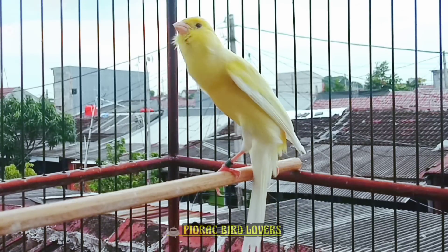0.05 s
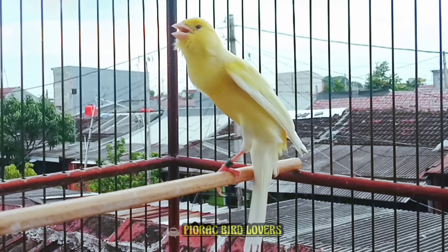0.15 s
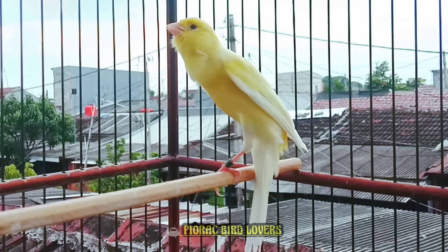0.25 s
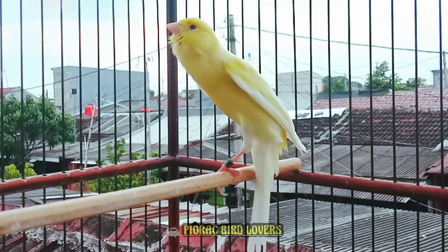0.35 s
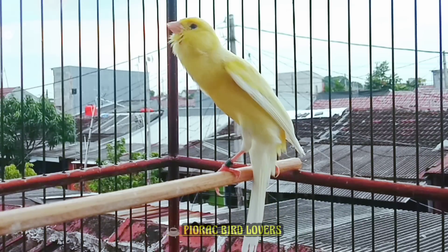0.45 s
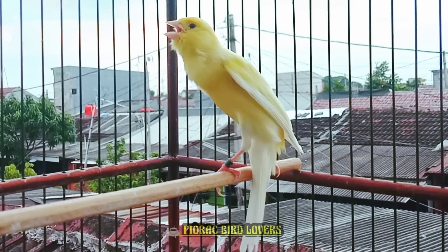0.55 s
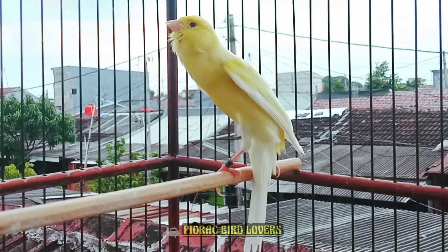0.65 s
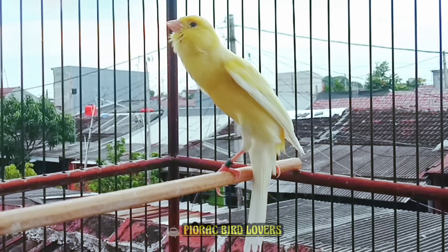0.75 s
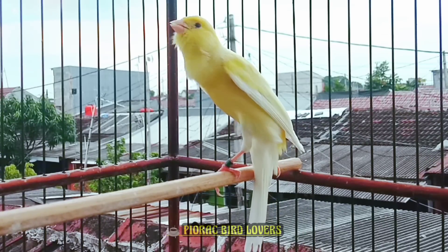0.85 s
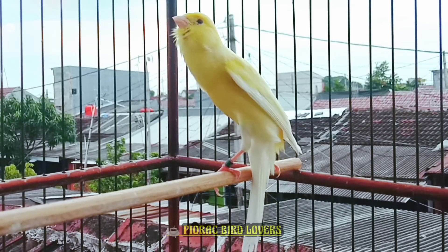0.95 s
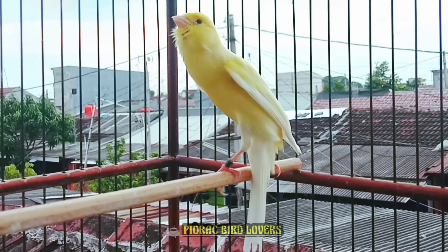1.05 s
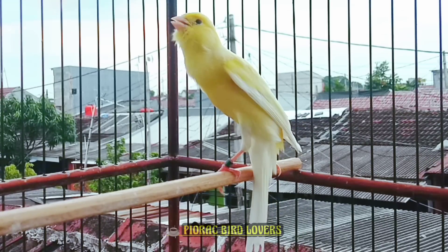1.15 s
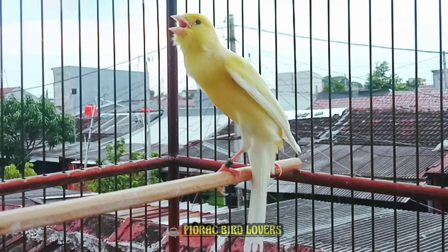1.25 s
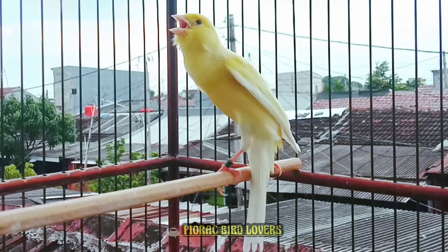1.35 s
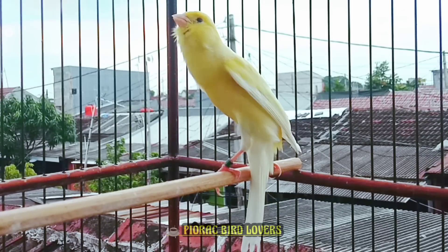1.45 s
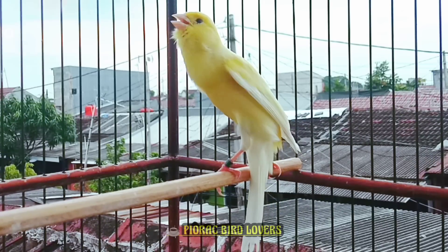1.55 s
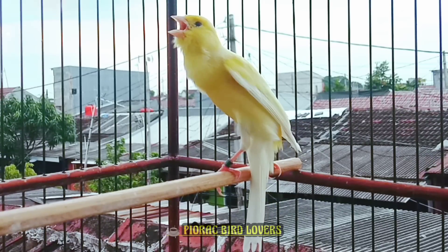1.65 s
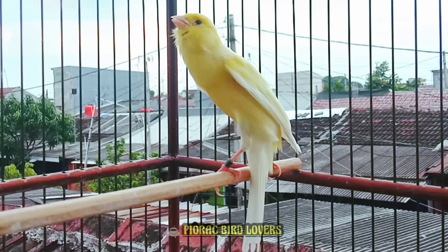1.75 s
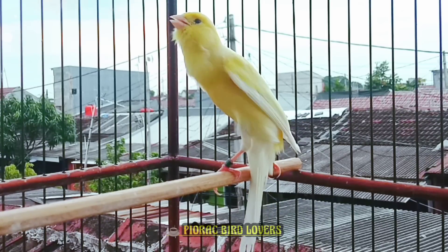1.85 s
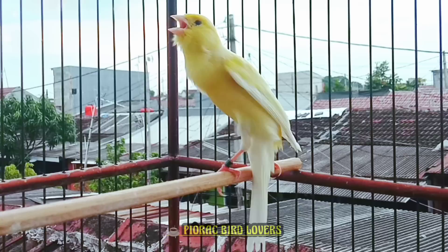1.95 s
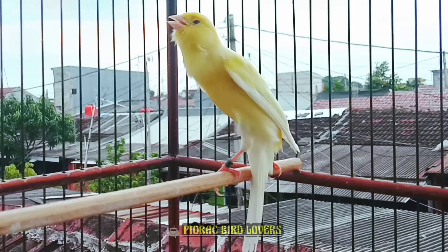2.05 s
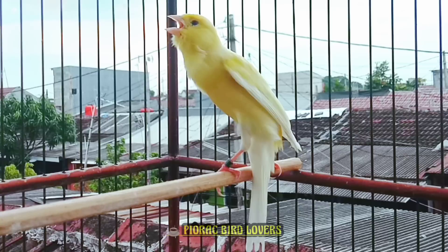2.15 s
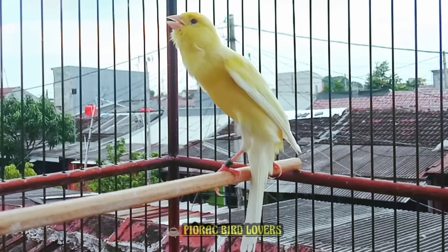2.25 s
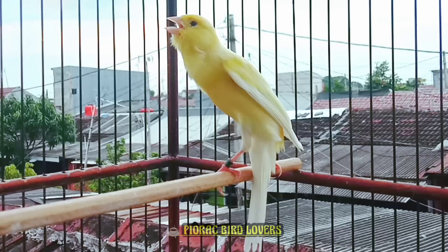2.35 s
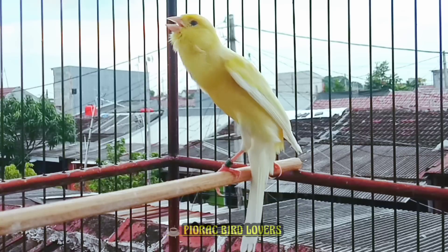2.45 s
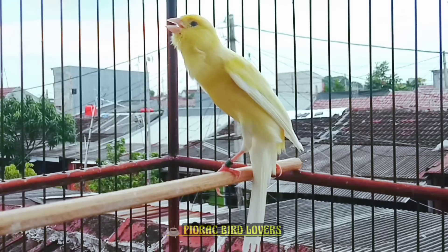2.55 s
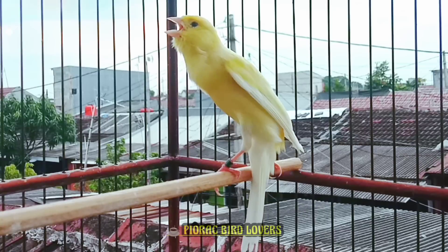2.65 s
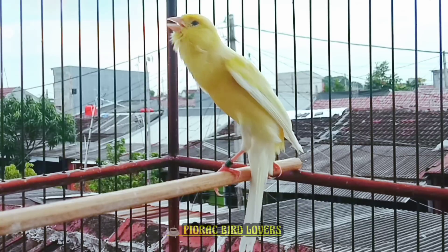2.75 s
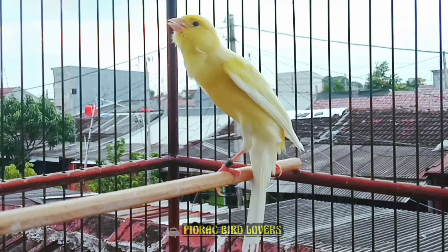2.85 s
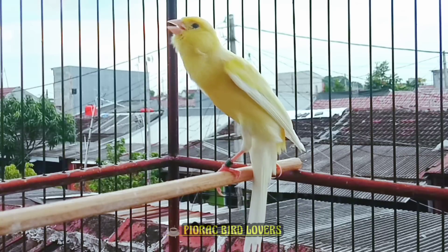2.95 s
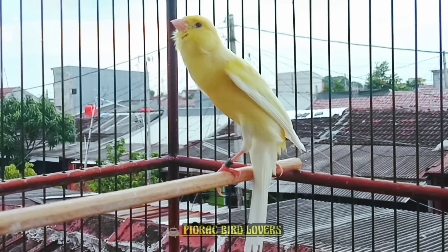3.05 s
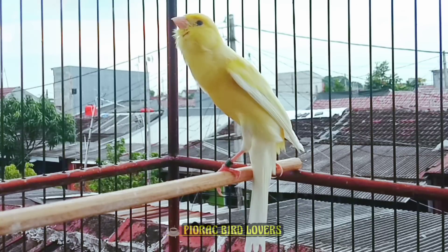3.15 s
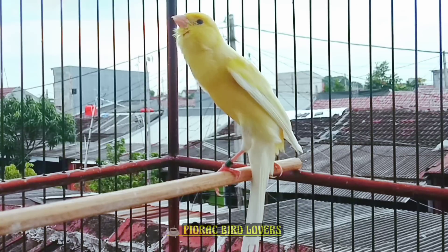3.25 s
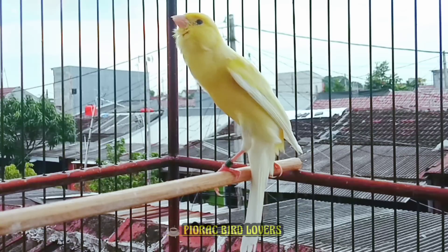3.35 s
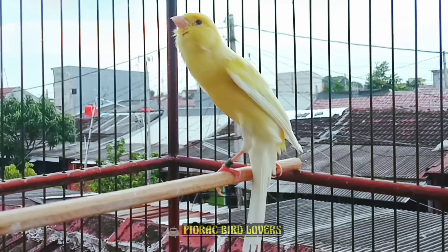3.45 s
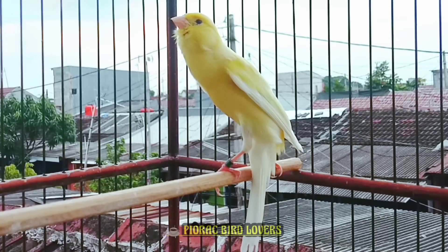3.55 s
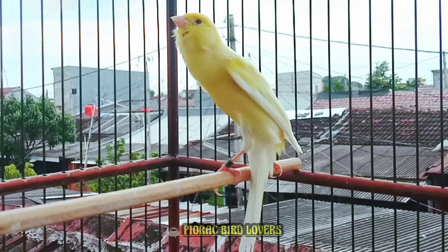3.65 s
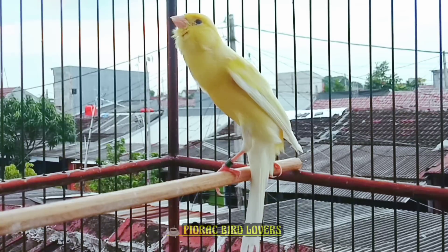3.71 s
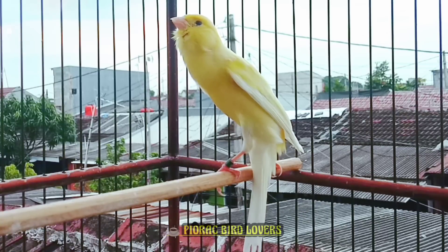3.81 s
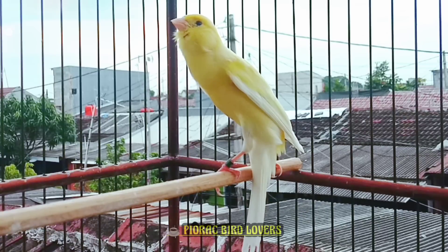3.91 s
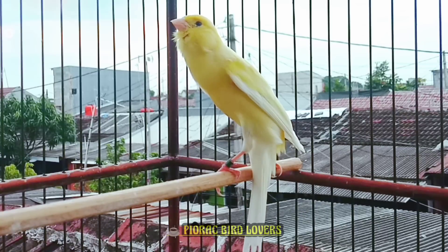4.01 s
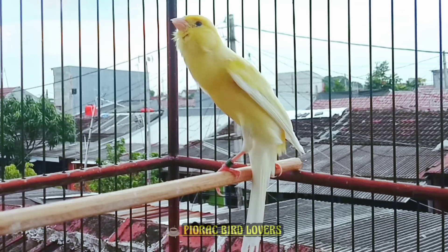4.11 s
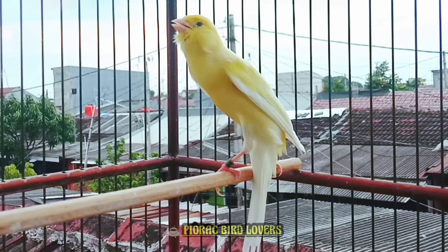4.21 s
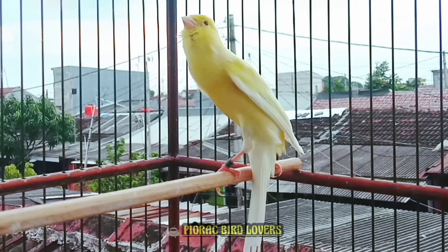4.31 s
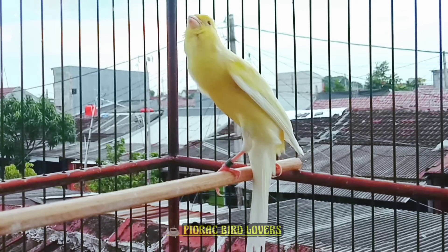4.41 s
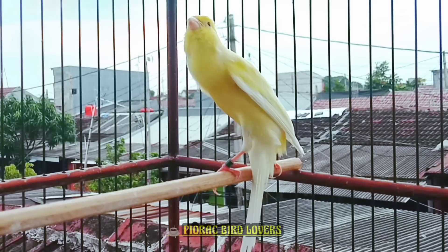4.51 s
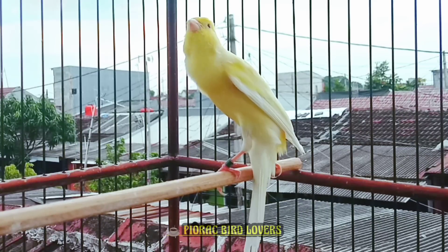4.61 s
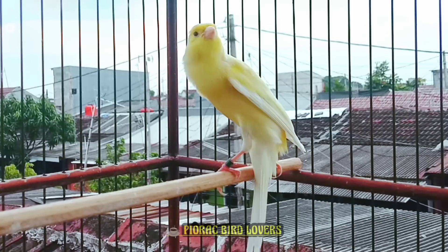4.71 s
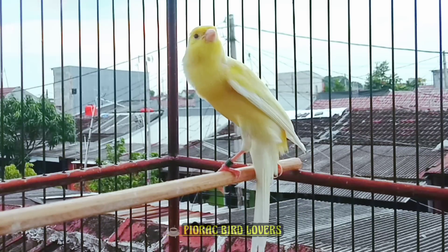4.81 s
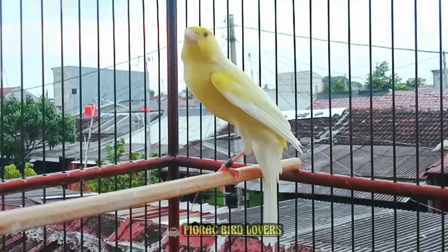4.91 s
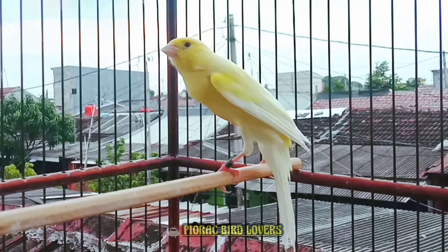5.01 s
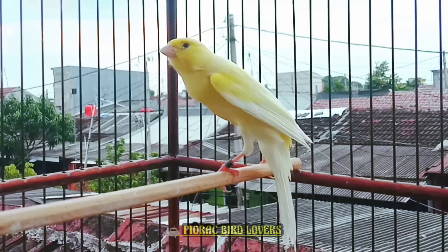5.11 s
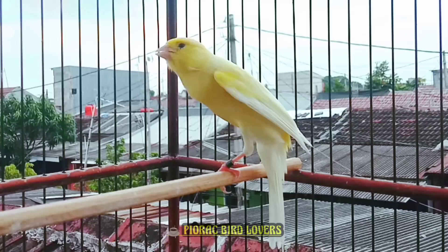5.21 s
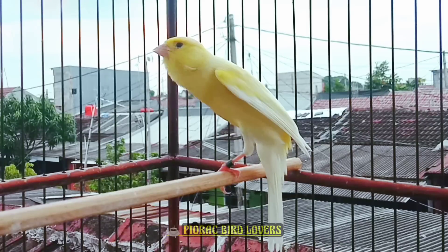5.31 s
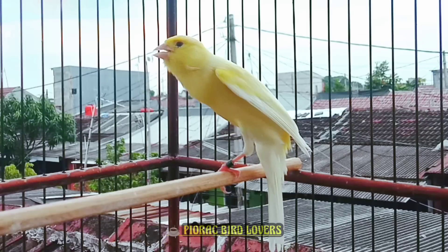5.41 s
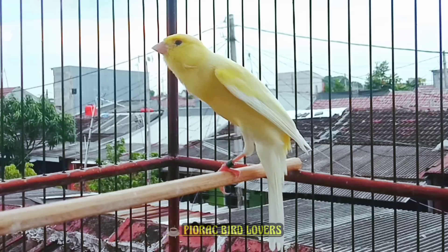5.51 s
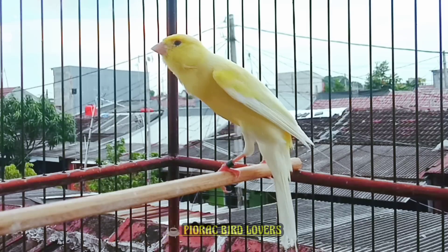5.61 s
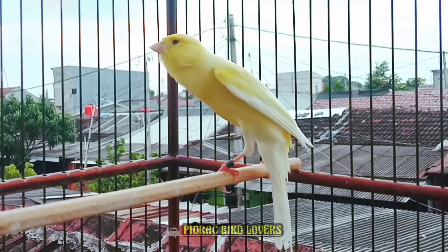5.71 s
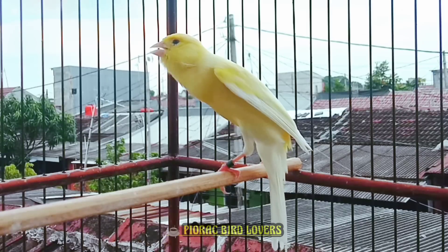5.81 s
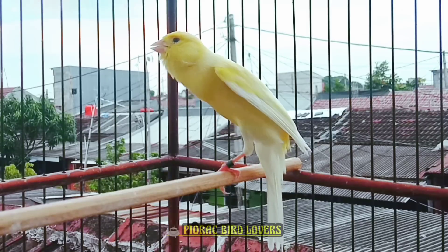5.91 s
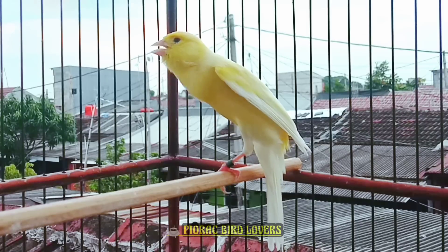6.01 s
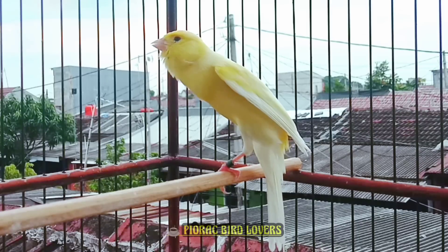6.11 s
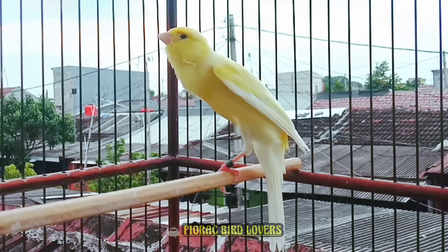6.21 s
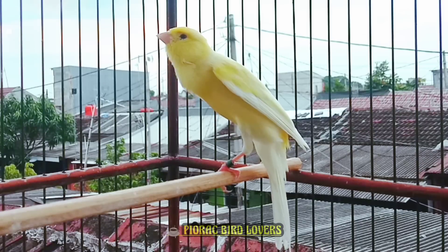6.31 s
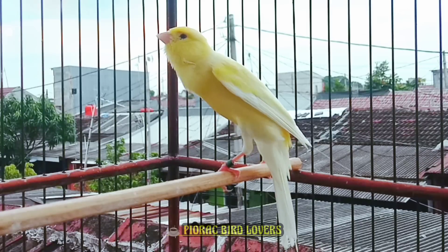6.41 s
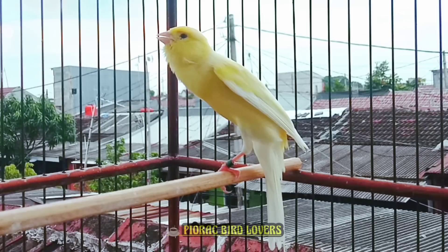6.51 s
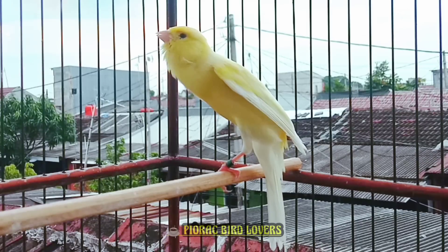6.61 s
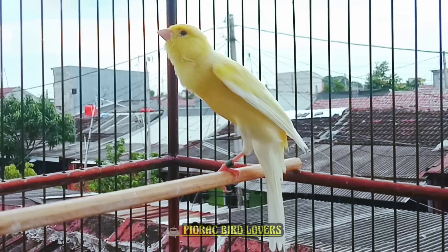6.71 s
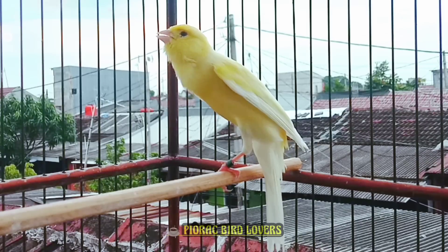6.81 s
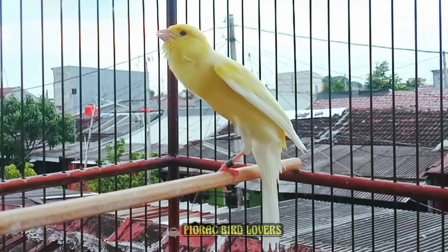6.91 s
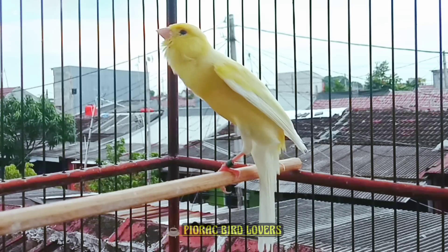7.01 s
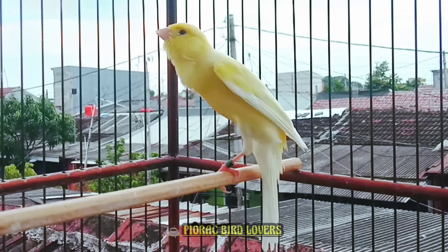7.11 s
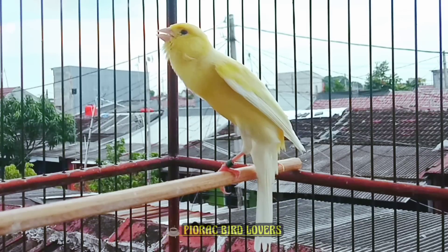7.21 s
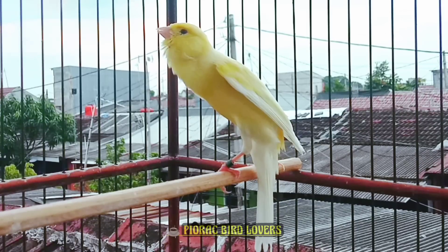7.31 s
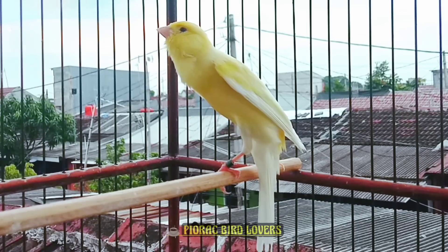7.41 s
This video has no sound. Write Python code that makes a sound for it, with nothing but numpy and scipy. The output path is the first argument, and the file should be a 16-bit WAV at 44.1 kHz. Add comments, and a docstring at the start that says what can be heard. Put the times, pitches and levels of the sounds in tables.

```python
"""A roof terrace: a caged canary sings close to the microphone, with chips, whistles, buzzes, sweeps, a ticking
trill, rolls and long falls. Each note is one gesture of pitch and pressure, repeated with small changes;
a near-sine voice flutters when it rasps, and cage and walls echo it.
Other cage birds call further off as quick glides and blurred streaks of tone, under a thin sinking whine.
Filtered noise makes the street's rumble, murmur and air; firing harmonics make its two engines."""
import sys
import numpy as np
from scipy import signal
from scipy.fft import rfft, irfft
from scipy.io import wavfile
from scipy.ndimage import uniform_filter1d, minimum_filter1d, map_coordinates

SR = 44100
rng = np.random.default_rng(int(sys.argv[2]) if len(sys.argv) > 2 else 0)


def digitize_waveform(pressure):
    """Quantize a signal to 16-bit integers and store it at the path in sys.argv[1].

    Rows of a 2-D input are taken as channels; values are limited to [-1, 1].
    """
    field = np.atleast_2d(pressure).T
    bounded = np.clip(field, -1, 1)
    quanta = np.round(bounded * 32767).astype(np.int16)
    wavfile.write(sys.argv[1], SR, quanta)


N = 328986
T = np.arange(N) / SR


def amp(db):
    """Decibels to gain."""
    return 10 ** (np.asarray(db) / 20)


def unit(x):
    """Scale to rms 1."""
    return x / np.sqrt(np.mean(x ** 2))


def ebb(x, span):
    """Fall from 1 to 0 over a span."""
    return np.clip(1 - x / span, 0, 1)


def follow(rows, t):
    """The columns of a table, joined by straight lines."""
    at, *columns = np.transpose(rows)
    return [np.interp(t, at, column) for column in columns]


def wander(rate_hz, t=T):
    """Smooth chance with a spread near 1: random knots joined by a cubic curve."""
    knots = rng.standard_normal(int((t[-1] - t[0]) * rate_hz) + 3)
    return map_coordinates(knots, [(t - t[0]) * rate_hz], order=3, mode="nearest")


def turn(hz):
    """Phase of an oscillator, from its running frequency."""
    return 2 * np.pi * np.cumsum(hz) / SR


def colour(x, points):
    """Filter by a spectrum of (Hz, dB) points, joined on a logarithmic pitch scale."""
    hz, db = np.transpose(points)
    f = np.maximum(np.fft.rfftfreq(2 * N, 1 / SR), 1)
    gain = amp(np.interp(np.log(f), np.log(hz), db))
    return irfft(rfft(x, 2 * N) * gain)[:N]


def hiss(count, hz, width_hz):
    """Noise in one band, rms 1."""
    edges = [max(hz - width_hz / 2, 20), hz + width_hz / 2]
    band = signal.butter(2, edges, "band", fs=SR, output="sos")
    return unit(signal.sosfilt(band, rng.standard_normal(count)))


def add(track, start_s, sound):
    """Mix a sound in at a given time, trimmed to the length of the scene."""
    i = int(round(start_s * SR))
    sound = sound[..., max(-i, 0):N - i]
    track[..., max(i, 0):max(i, 0) + sound.shape[-1]] += sound


def syrinx(t, hz, db, rasp, flutter_hz, overtones, flicker_db, hiss_db):
    """A near-sine voice; rasp makes it flutter in pitch and pressure. Rows: fundamental, overtones with hiss."""
    swing, jitter = .11, .068  # shares of the pitch at full rasp
    shape = .65  # how long the syrinx stays shut in each flutter (below 1 = narrow pulses)
    flutter = turn(flutter_hz * (1 + .14 * wander(150, t)))
    hz = hz * (1 + rasp * (-swing * np.cos(flutter + 1.6) + jitter * wander(1300, t)))
    shut = (.5 - .5 * np.cos(flutter)) ** shape
    pulses = (1 - np.clip(rasp, 0, 1) * shut) * amp(2 * rasp * wander(500, t))
    edges = np.clip(np.minimum(t - t[0], t[-1] - t) / .0012, 0, 1)  # soft ends against clicks
    phase = turn(hz)
    partials = []
    for multiple, level_db in overtones:
        audible = multiple * hz < SR / 2
        partials.append(amp(level_db) * np.sin(multiple * phase) * audible)
    upper = sum(partial * amp(flicker_db * wander(130, t)) for partial in partials[1:])
    air = amp(hiss_db) * rasp * rng.standard_normal(len(t))
    return np.array([partials[0], upper + air]) * amp(db) * pulses * edges


def notes(table, pitch_hz, attack, release, sag_db, rasp, clears=.78, grain=.09, flutter_hz=240, slows=0,
          waver=.002, shimmer_db=1.2, flicker_db=5.0, bright_db=0, hiss_db=-28, overtones=None, ratio=1):
    """Repeat one varied gesture: pressure swells, sags and lets go; the opening rasp clears to a fine grain.
    Places in pitch_hz, attack, release and clears are shares of the note's length."""
    # overtones of the singing voice: multiple, level_db
    voice_overtones = [(1, 0), (2, -31.5), (3, -38.5), (4, -44.5)]
    depth_db = 17  # a note swells from, and fades to, this far down
    out = np.zeros((2, N))
    for start_s, length_s, note_db, reach in table:
        t = np.arange(int(length_s * SR)) / SR
        u = t / length_s
        hz = ratio * follow(pitch_hz, u)[0] * (1 + (reach - 1) * u) * (1 + waver * wander(250, t))
        swell_db = -depth_db * (ebb(u, attack) + ebb(1 - u, release))
        db = note_db - sag_db * u + swell_db + shimmer_db * wander(220, t)
        rough = grain + (rasp - grain) * ebb(u ** 2, clears ** 2)
        slowing_hz = flutter_hz * (1 - slows * u)
        add(out, start_s, syrinx(t, hz, db, rough, slowing_hz, overtones or voice_overtones, flicker_db, hiss_db))
    return out * amp([[0], [bright_db]])


def canary():
    """The near bird's song; in the buzzes the second side of the syrinx sings below the first."""
    # gesture of each kind of note: pitch_hz path (share of length, Hz), attack and release (shares), sag_db
    # over the note, opening rasp (0-1), the share by which it clears, and the grain (0-1) that stays
    slur = dict(pitch_hz=[(0, 2720), (.24, 3100), (.52, 3880), (.8, 4240), (1, 4400)],
            attack=.36, release=.035, sag_db=6, rasp=.45, clears=.3, grain=.06)
    chip = dict(pitch_hz=[(0, 4800), (.17, 5550), (.38, 5546), (.58, 5420), (1, 3844)],
            attack=0.13, release=0.11, sag_db=-4, rasp=0.22, clears=0.47, grain=0.18, flutter_hz=191, waver=.008, shimmer_db=3.5, hiss_db=-14, bright_db=0.5)
    whistle = dict(pitch_hz=[(0, 2812), (.12, 2905), (.6, 2926), (1, 2895)],
               attack=0.029, release=0.037, sag_db=0.5, rasp=0, grain=0.025, waver=0.0029, shimmer_db=-0.3, flicker_db=0, bright_db=0.5)
    squeak = dict(pitch_hz=[(0, 5640), (.6, 6210), (1, 6330)],
              attack=.08, release=.1, sag_db=2.5, rasp=0.16, grain=0.15, flutter_hz=165, bright_db=-0.5)
    buzz = dict(pitch_hz=[(0, 6410), (.3, 5630), (.55, 4740), (.77, 2950), (1, 2364)],
            attack=0.35, release=0.039, sag_db=18, rasp=.9, grain=0.77, flutter_hz=192.6, slows=0.35, hiss_db=-25.5, bright_db=-0.5)
    sweep = dict(pitch_hz=[(0, 3700), (.17, 3666), (.5, 4430), (1, 5790)],
             attack=0.17, release=0.016, sag_db=5.5, rasp=0.82, clears=0.39, grain=0.1, flutter_hz=240.8, hiss_db=-25.5, bright_db=0)
    hook = dict(pitch_hz=[(0, 3180), (.28, 3780), (.64, 4400), (1, 4660)],
            attack=0.13, release=0.34, sag_db=3, rasp=0.81, clears=0.54, flutter_hz=234.7, bright_db=-2.5)
    tick = dict(pitch_hz=[(0, 3000), (.35, 2790), (.75, 2460), (1, 1950)],
            attack=.4, release=.22, sag_db=-2, waver=.007, rasp=.5, clears=.4, grain=.13, hiss_db=-25, bright_db=-2)
    chirp = dict(pitch_hz=[(0, 5260), (.38, 5260), (.78, 4560), (1, 3390)],
             attack=0.71, release=0.18, sag_db=-10.5, rasp=0.97, clears=.6, flutter_hz=186, hiss_db=-15)
    coo = dict(pitch_hz=[(0, 2880), (.2, 3002), (.85, 3000), (1, 2850)],
           attack=0.045, release=0.24, sag_db=7, rasp=0.17, waver=0.0012, shimmer_db=3.5, flicker_db=4, bright_db=6)
    pickup = dict(pitch_hz=[(0, 4070), (.55, 4615), (1, 4800)],
              attack=0.067, release=0.059, sag_db=-11.5, rasp=0, bright_db=2.5)
    roll = dict(pitch_hz=[(0, 3150), (.14, 2220), (.44, 3600), (.7, 4320), (.92, 4670), (1, 4620)],
            attack=.44, release=.035, sag_db=1, bright_db=-4, rasp=.5, clears=.22, grain=.075, shimmer_db=1.1)
    fall = dict(pitch_hz=[(0, 4980), (.14, 4320), (.32, 3830), (.6, 3540), (.86, 3150), (.93, 2680),
            (1, 1500)],
            attack=.09, release=.05, sag_db=5, bright_db=-3, rasp=.25, clears=.1, grain=.055, shimmer_db=1.0)
    # notes sung: start_s, length_s, level_db, reach (factor on the pitch by the end of the note)
    slurs = [(-0.043, 0.088, -4.5, .985), (0.172, 0.079, -2, 1.005)]
    chips = [(0.365, 0.045, -11.5, .995), (0.633, 0.045, -11, 0.95), (0.978, 0.043, -10, 0.97)]
    whistles = [(0.429, 0.16, -17, 0.99), (0.695, 0.14, -16.5, 0.99), (1.039, 0.14, -17, 0.99)]
    squeaks = [(1.297, 0.032, -24, 1.13), (1.326, 0.019, -8, 0.96), (1.66, .028, -10, 1.08)]
    buzzes = [(1.338, .172, -1, .96), (1.69, .163, -0.5, 1.047)]
    sweeps = [(1.61, 0.064, -4, 1), (1.969, 0.058, -4, 0.93), (2.157, 0.07, -5, .99),
              (2.346, 0.068, -4.5, 1), (2.532, 0.065, -4, .99), (2.687, 0.069, -4.5, 0.95)]
    hooks = [(2.82, 0.072, -5.5, 1.05), (2.959, 0.057, -5.5, .985)]
    chirps = [(4.323, 0.034, -14, 0.99)]
    coos = [(4.38, 0.17, -23.5, 0.95)]
    pickups = [(5.295, 0.018, -24.5, 1), (5.776, 0.034, -20, 0.97)]
    rolls = [(5.317, 0.071, -12, 1.07), (5.384, 0.068, -10, 1.06), (5.454, 0.065, -10, 1.02),
             (5.808, 0.071, -11, 1.026), (5.878, 0.065, -9, 1.013), (5.944, 0.07, -8.5, 0.98),
             (6.016, 0.065, -8.5, .955), (6.088, 0.062, -8.5, 0.88), (6.158, 0.064, -10, 0.91)]
    falls = [(6.507, 0.21, -10, 0.99), (6.891, 0.19, -8.5, 0.99), (7.23, 0.19, -9, 0.98)]
    # how the fundamental carries from beak to microphone; glides swell and dip through it: pitch_hz, level_db
    carry = [(1700, -7.5), (2250, -10.5), (2600, -5), (3050, -10), (3480, -5), (3690, -12), (3860, -6),
             (4400, -0.5), (4920, -8.5), (5300, -5), (5530, -11.5), (5760, 0), (6400, -10.5)]
    # how the overtones and hiss carry to the microphone: pitch_hz, level_db
    treble = [(2000, -12), (5800, 4), (7500, 0), (9000, -6.5), (10500, -17), (11600, -18), (12800, -19),
              (14000, -11.5), (15300, -4)]
    song = [(slurs, slur), (chips, chip), (whistles, whistle), (squeaks, squeak), (buzzes, buzz),
            (sweeps, sweep), (hooks, hook), (trill(), tick), (chirps, chirp), (coos, coo),
            (pickups, pickup), (rolls, roll), (falls, fall)]
    first_side = sum(notes(table, **gesture) for table, gesture in song)
    second_side = amp(-8) * notes(buzzes, ratio=.77, **buzz)
    tone, upper = first_side + second_side
    return colour(tone, carry) + colour(upper, treble) + beeps() + puffs()


def street():
    """Steady noise shaped into traffic rumble and murmur, faint air and two narrow bands of drone."""
    # spectrum of traffic: pitch_hz, level_db
    traffic_colour = [(15, -42), (25, -22), (38, -26), (92, 3.5), (113, 7.5), (190, -6.5), (252, -27),
                      (310, -24), (432, -35.5), (575, -32.5), (684, -43), (1100, -66.5), (1430, -61),
                      (2420, -120)]
    # spectrum of air: pitch_hz, level_db
    air_colour = [(500, -7), (900, 3), (1500, -3.5), (2200, -6.5), (4000, -3.5), (7000, -3), (9000, -21.5),
                  (15000, -21.5)]
    # droning bands: centre_hz, width_hz, level_db
    drones = [(1248, 94, -60.5), (1761, 146, -58.5)]
    # swells of passing traffic: peak_s, half_length_s, rise_db
    swells = [(0.401, 0.23, 4), (1.552, 0.36, 5.6), (7.181, .2, 8.2)]
    swell_db = sum(db * np.exp(-((T - at) / half) ** 2) for at, half, db in swells)
    rumble = colour(colour(rng.standard_normal(N), traffic_colour), [(170, 0), (400, -40)])
    murmur = colour(colour(rng.standard_normal(N), traffic_colour), [(120, -40), (260, 0)])
    air = colour(rng.standard_normal(N), air_colour)
    out = unit(rumble) * amp(-43 + swell_db + 2 * wander(11))
    out += unit(murmur) * amp(-56 + 2 * wander(16))
    out += unit(air) * amp(-60 + 1.4 * wander(8))
    for hz, width_hz, db in drones:
        out += hiss(N, hz, width_hz) * amp(db + 2 * wander(6.6))
    return out


def chorus():
    """Far song smeared by the walls: wavering sines overlap as patchy, fading streaks of tone."""
    # level over time: time_s, level_db
    levels = [(0, -47.5), (2.4, -55), (4.3, -48.5), (4.8, -60.5), (7.46, -74.5)]
    # spectrum: pitch_hz, level_db
    spectrum = [(2000, -31), (3200, 4), (4000, 10.5), (5500, 4), (6300, 6.5), (7200, -12), (9000, -34.5)]
    streaks = np.zeros(N)
    for hz in np.geomspace(2800, 7600, 30):
        tone = np.sin(turn(hz * (1 + .01 * wander(90))))
        streaks += tone * amp(3.5 * wander(33))
    level_db, = follow(levels, T)
    return unit(colour(streaks, spectrum)) * amp(level_db)


def far_birds():
    """A second canary's trills: quick, slightly rasping glides repeated at an even rate."""
    # trills, before the far bird's mix level: start_s, end_s, rate_hz (notes per s), first_hz, last_hz, level_db
    far_trills = [(0.063, 1, 7.6, 4655, 6140, -47.5), (1.016, 2.7, 8.05, 5580, 6350, -44.5),
                  (3.175, 4.3, 17, 4530, 6160, -48), (4.416, 4.705, 10.3, 4790, 6400, -47),
                  (4.811, 5.12, 16, 5920, 4330, -50.5)]
    duty = .65  # share of each beat that sounds
    out = np.zeros(N)
    for start_s, end_s, rate_hz, first_hz, last_hz, db in far_trills:
        glide = [(0, first_hz), (.7, first_hz + (last_hz - first_hz) * .77), (1, last_hz)]
        rows = [(s, duty / rate_hz, db, 1) for s in np.arange(start_s, end_s, 1 / rate_hz)]
        out += notes(rows, glide, attack=.2, release=.12, sag_db=0, rasp=.25, grain=.12, shimmer_db=2.5)[0]
    return out


def beeps():
    """Soft nasal squeaks between the canary's notes: a low fundamental under strong overtones."""
    # squeaks: start_s, length_s, level_db, reach (factor on the pitch by the end)
    beep_rows = [(0.066, 0.03, -54, 1), (0.283, 0.031, -49.5, 1), (1.202, 0.018, -54, 1.15),
                 (1.88, 0.046, -48, 1.05), (2.06, 0.051, -48, 1.01), (2.25, 0.043, -50, 1),
                 (2.442, 0.037, -51, 0.98), (2.63, 0.066, -53, 0.94)]
    # their gesture: pitch_hz path (share of length, Hz), attack, release (shares), sag_db, rasp, grain (0-1)
    beep = dict(pitch_hz=[(0, 1223), (.7, 1292), (1, 1205)],
            attack=0.067, release=0.24, sag_db=-3, rasp=.05, grain=0.16)
    # their overtones: multiple, level_db
    beep_overtones = [(1, 2.5), (2, 4), (3, 6), (4, 5.5), (5, -5), (6, -15), (7, -24), (8, -37.5)]
    return notes(beep_rows, overtones=beep_overtones, **beep).sum(axis=0)


def puffs():
    """Soft hisses and a beak click between notes: short swells of band noise."""
    # puffs: start_s, length_s, centre_hz, width_hz, level_db
    puff_rows = [(0.1243, 0.005, 2850, 690, -26.5), (1.537, 0.019, 3670, 2980, -40),
                 (5.163, 0.11, 3980, 1100, -52), (6.502, 0.028, 4400, 2520, -40),
                 (6.878, 0.039, 4620, 2520, -44), (7.215, 0.03, 4280, 2444, -41)]
    out = np.zeros(N)
    for start_s, length_s, hz, width_hz, db in puff_rows:
        count = int(length_s * SR)
        add(out, start_s, hiss(count, hz, width_hz) * np.hanning(count) * amp(db))
    return out


def engine(passes, spectrum, rough, noise_db):
    """A distant engine: firing harmonics fade and waver on their way over the roofs, with exhaust noise."""
    fade_s = .24
    path = []
    gain = np.zeros(N)
    for start_s, end_s, first_hz, last_hz, db in passes:
        path += [(start_s, first_hz), (end_s, last_hz)]
        gain += amp(db) * (1 - ebb(np.minimum(T - start_s, end_s - T), fade_s))
    hz, = follow(path, T)
    phase = turn(hz * (1 + .00648 * wander(7.2)))
    stack = np.zeros(N)
    for k in range(1, 17):
        offset = .87 * wander(11) + rng.uniform(0, 2 * np.pi)
        stack += (1 + rough * wander(7)) * np.sin(k * phase + offset)
    exhaust = colour(rng.standard_normal(N), [(900, 5.5), (3000, -47.5)])  # distance takes the treble
    sound = unit(colour(stack, spectrum)) + amp(noise_db) * unit(colour(exhaust, spectrum))
    return unit(sound) * gain


def motorbike():
    """A rough engine with much exhaust noise, coming and going."""
    # passes: start_s, end_s, first_hz, last_hz (firing rates), level_db
    passes = [(1.6, 2.95, 61.5, 61.23, -57.5), (3.25, 4.7, 69.87, 73.86, -49.5)]
    # spectrum: pitch_hz, level_db
    spectrum = [(200, -2), (330, -1), (550, -3.5), (850, -4), (1100, -17), (1500, -32.5)]
    return engine(passes, spectrum, rough=.7, noise_db=-1)


def trill():
    """Rows of the ticking trill: an even beat at first, then ever slower, and a little softer throughout."""
    gap_s, slowing_s_per_tick, tiring_db_per_s = .0547, .00089, 1.35
    count, steady_count = 22, 12
    k = np.arange(count)
    since_s = k * gap_s + slowing_s_per_tick * np.cumsum(np.maximum(k - steady_count, 0))
    scatter = rng.standard_normal((count, 2)) * [.6, .011]  # level in dB, share of pitch
    return [(3.057 + s, .0185, -12 - tiring_db_per_s * s + db, 1 + bend)
            for s, (db, bend) in zip(since_s, scatter)]


def whine():
    """A thin high whine: one wavering sine that fades in and sinks slowly."""
    since_s = T - 4.4
    hz = (6830 - 20 * since_s) * (1 + .0017 * wander(91))
    return np.sin(turn(hz)) * amp(-63.5 + wander(3.3)) * (1 - ebb(since_s, .28))


def hum():
    """A smoother engine with little exhaust noise, humming low."""
    # passes: start_s, end_s, first_hz, last_hz (firing rates), level_db
    passes = [(4.9, 6.6, 52.43, 50.39, -42), (6.8, 7.5, 49.3, 49.1, -42)]
    # spectrum: pitch_hz, level_db
    spectrum = [(100, -15.5), (160, 1), (220, -9.5), (270, -8.5), (308, -1.5), (370, -9), (450, -27),
                (600, -31.5), (900, -33.5)]
    return engine(passes, spectrum, rough=.5, noise_db=-10)


def terrace(x, wet_db, t60_s):
    """A few sharp echoes from the cage, then a short diffuse tail from walls and roof."""
    # echoes off the cage and nearby things: delay_s, level_db
    cage = [(.0013, -66.5), (.0031, -12.5), (.0068, -20.5), (0.0113, -20.5), (0.0178, -28)]
    t = T[:SR // 2]
    tail = rng.standard_normal(len(t)) * amp(-60 * t / t60_s) * np.clip((t - .004) / .0045, 0, 1)
    response = amp(wet_db) * tail / np.sqrt(np.sum(tail ** 2))
    response[0] = 1  # direct sound
    for delay_s, db in cage:
        response[int(delay_s * SR)] += amp(db)
    return signal.fftconvolve(x, response)[:N]


def scene():
    """The near bird, the far birds and whine, the street and its engines."""
    near = terrace(canary(), wet_db=-19, t60_s=.23)
    far = amp(-2.5) * terrace(far_birds(), wet_db=1, t60_s=.35)
    traffic = street() + motorbike() + hum()
    return (near + far + chorus() + whine() + traffic)[None]


def record(dry):
    """A fast limiter holds the loudest notes down; a steep low-pass cuts the top."""
    ceiling, top_hz = .49, 15900
    size = int(.003 * SR)
    gain = np.minimum(1, ceiling / (np.abs(dry) + 1e-9))
    gain = uniform_filter1d(minimum_filter1d(gain, size), size)
    low_pass = signal.ellip(10, .2, 80, top_hz, fs=SR, output="sos")
    return signal.sosfilt(low_pass, dry * gain)


dry = scene()
out = record(dry)
digitize_waveform(out)
```